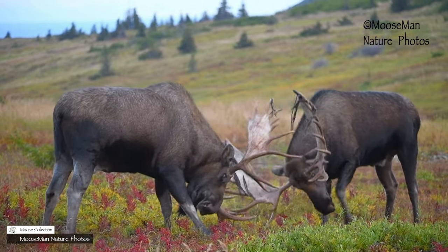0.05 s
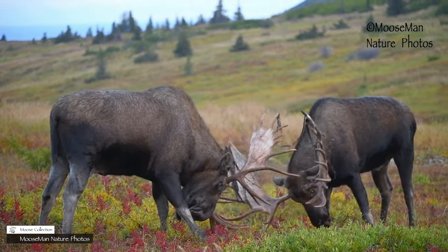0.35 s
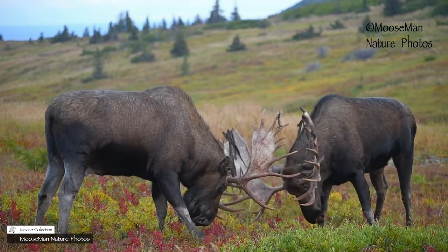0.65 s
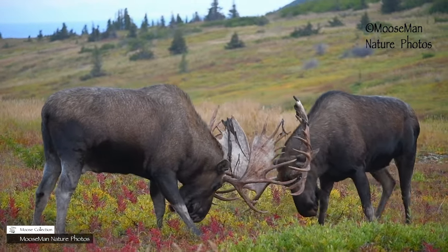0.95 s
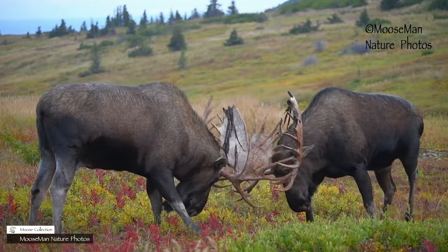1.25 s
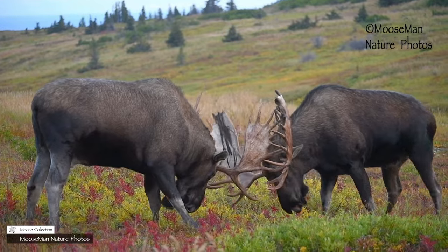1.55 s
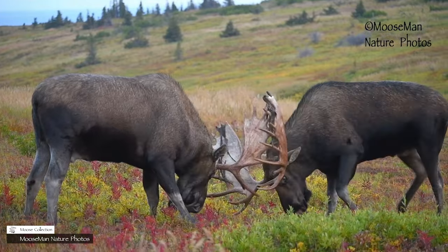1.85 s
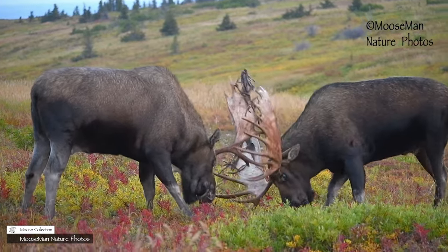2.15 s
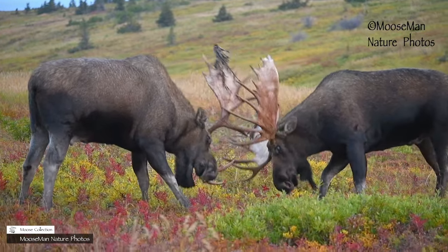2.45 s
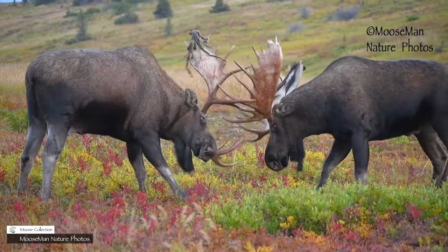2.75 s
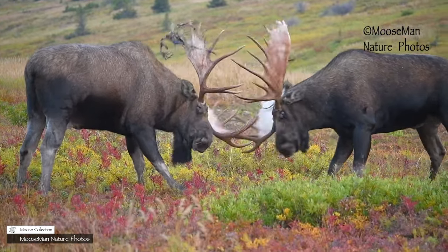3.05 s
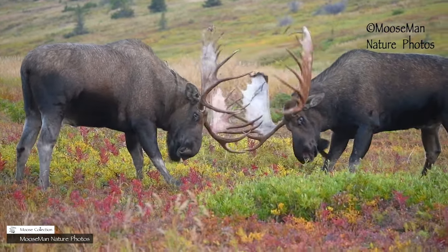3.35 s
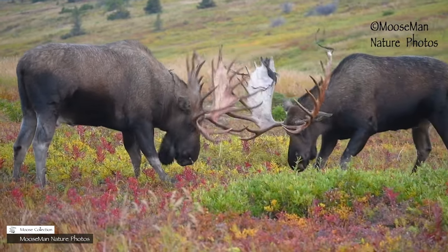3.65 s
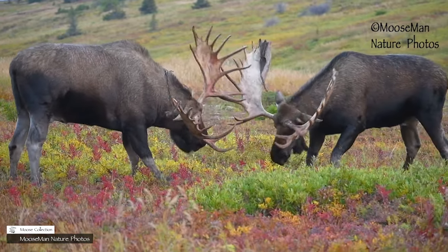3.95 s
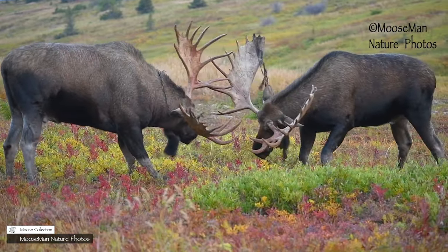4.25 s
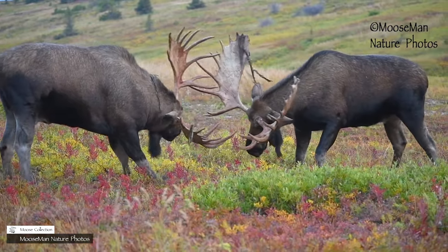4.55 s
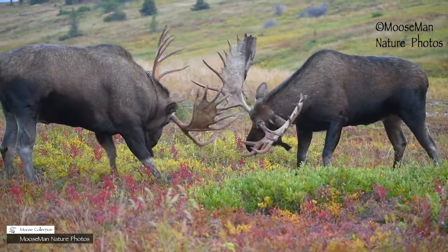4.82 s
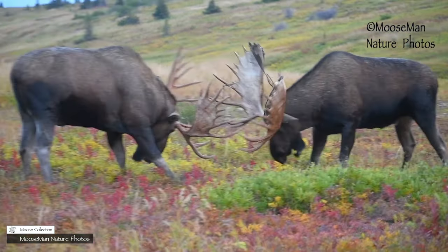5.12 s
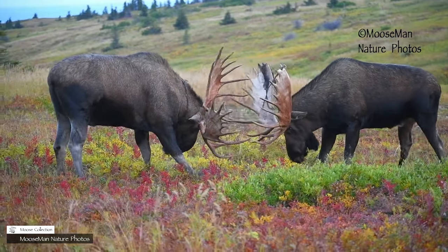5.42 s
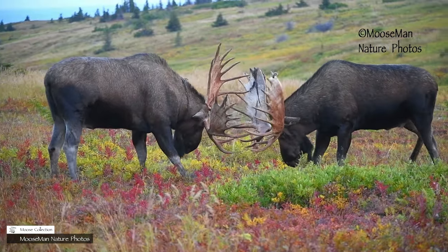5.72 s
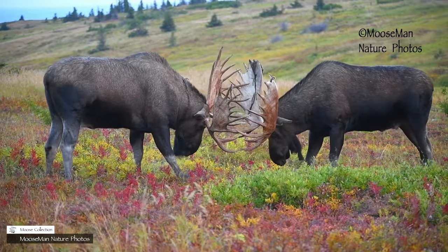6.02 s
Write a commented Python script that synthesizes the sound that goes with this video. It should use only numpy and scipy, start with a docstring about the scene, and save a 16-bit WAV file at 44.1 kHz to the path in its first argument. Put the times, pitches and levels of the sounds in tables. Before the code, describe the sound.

Two bull moose spar on open tundra, their antlers straight ahead of the microphone. Light bony clacks and dull knocks come in irregular clusters, with short scraping rattles and a few bright snaps. The hardest blows land around the middle, followed by a quick clattering flurry and some lighter taps. Distant air hisses steadily, a breeze rumbles softly on the microphone, and shrubs rustle faintly nearby.

```python
"""Open tundra: two bull moose spar, their antlers clacking, skidding and rattling in irregular bouts.
Each contact sends bending waves through tines and palms, treble first, the hollow ring after it.
Rough bone sticks and slips, hard tips snap together, and the hillside answers faintly. Distant air
hisses, a breeze bumps the microphone's ports, shrubs stir and something brushes lightly close by."""
import sys
import numpy as np
from scipy import signal
from scipy.fft import rfft, irfft, next_fast_len
from scipy.io import wavfile
from scipy.ndimage import map_coordinates

SR = 44100
rng = np.random.default_rng(int(sys.argv[2]) if len(sys.argv) > 2 else 0)


def to_wav(s):
    """Save 16-bit WAV."""
    ch = np.atleast_2d(s).T  # columns
    pcm = np.round(np.clip(ch, -1, 1) * 32767)  # PCM
    wavfile.write(sys.argv[1], SR, pcm.astype(np.int16))


N = 268260
RING_SIZE = 8192  # samples of room for a short sound to ring out

# The lasting modes of the antlers. Each row: pitch in Hz, level in dB, t60 in seconds.
ANTLER_MODES = [(137.3, -22.5, 0.31), (197.9, -7, 0.11), (331.3, -16, 0.089), (436, -2.5, 0.094),
                (505.7, -6.5, 0.13), (573.5, -2.5, 0.081), (669, 2, 0.049), (750.6, -10.5, 0.13),
                (903, -11, 0.086), (982, -7.5, 0.071), (1110, 2.5, 0.056), (1233, 5, 0.025),
                (1545, 6, 0.022), (1666, -5.5, 0.05), (1963, 3, 0.029), (2295, -6.5, 0.043),
                (2793, -2.5, 0.027), (3267, -4.5, 0.024), (3930, -12.5, 0.034), (4640, -8, 0.0078),
                (5130, -25, 0.055)]


def amp(db):
    """Decibels to gain."""
    return 10 ** (np.asarray(db) / 20)


def unit(x):
    """x at rms 1."""
    return x / np.sqrt(np.mean(x ** 2) + 1e-20)


def along(points, hz):
    """(Hz, value) points read on a log axis."""
    f, v = np.transpose(points)
    return np.interp(np.log(hz + 1), np.log(f + 1), v)


def wobble(rate):
    """A smooth random curve, rate knots a second."""
    knots = rng.standard_normal(int(N * rate / SR) + 4)
    return map_coordinates(knots, [np.arange(N) * rate / SR])


def filtered(x, response):
    """x through a filter whose gain is a function of frequency."""
    n = x.shape[-1]
    m = next_fast_len(n + RING_SIZE)
    return irfft(rfft(x, m) * response(np.fft.rfftfreq(m, 1 / SR)), m)[..., :n]


def equalised(x, eq):
    """x through an EQ curve of (Hz, dB) points."""
    return filtered(x, lambda hz: amp(along(eq, hz)))


def add(track, s, sound):
    """Mix a sound into a track at s seconds."""
    part = track[..., round(s * SR):][..., :sound.shape[-1]]
    part += sound[..., :part.shape[-1]]


def panned(x, pan_db):
    """x placed in stereo, the left pan_db above the right."""
    return x * amp([[pan_db / 2], [-pan_db / 2]])


def stroke(t, length, rise, fall):
    """An envelope that rises, holds until length and dies away."""
    return (1 - np.exp(-t / rise)) * np.exp(-np.maximum(t - length, 0) / fall)


def stereo_noise(eq, likeness):
    """Coloured noise of rms 1; likeness holds (Hz, left-right correlation) points."""
    def mid_side_gains(hz):
        angle = np.arccos(np.clip(along(likeness, hz), -1, 1)) / 2
        return amp(along(eq, hz)) * [np.cos(angle), np.sin(angle)]
    mid, side = filtered(rng.standard_normal((2, N)), mid_side_gains)
    return unit(np.array([mid + side, mid - side]))


def dying_noise(t60s, size):
    """Noise in which every frequency dies at its own speed."""
    hz, t, spectra = signal.stft(rng.standard_normal(size), SR, nperseg=128)
    decay = amp(-60 * t / along(t60s, hz)[:, None])
    return signal.istft(spectra * decay, SR, nperseg=128)[1][:size]


def air(start_db=-37.5, fall_db_per_s=0.23):
    """Distant air: an even bed of hiss that slowly eases."""
    # The colour of the hiss. Each row: frequency in Hz, gain in dB.
    hiss_eq = [(88, -51), (150, -26), (193, -13), (291, -6.5), (383, -5.5), (439, -5), (555, -1.5),
               (662, -2), (941, -1.5), (1760, -3), (1980, -4.5), (2220, -6.5), (4410, -18.5), (16000, -32)]
    # Its stereo image. Each row: frequency in Hz, left-right correlation.
    likeness = [(60, 0.16), (150, 0.82), (380, 0.97), (950, 0.82), (2380, 0.21), (5980, -0.48),
                (15000, 0.26)]
    level_db = start_db - fall_db_per_s * np.arange(N) / SR + 0.2 * wobble(4.87)
    return amp(level_db) * stereo_noise(hiss_eq, likeness)


def breeze(gust_db=4.5, lift_db=7.0):
    """Wind bumps the microphone: lumpy rumble and a few stronger puffs, different at each port."""
    # The rumble's rise and fall. Each row: time in seconds, level in dB before the lift.
    swells = [(0.0, -48.5), (0.44, -58.5), (0.71, -48), (2.37, -46.5), (2.79, -55), (3.15, -43.5),
              (3.33, -53), (3.52, -65), (4.27, -59), (5.21, -63), (5.84, -59), (6.08, -47)]
    # Its colour. Each row: frequency in Hz, gain in dB.
    rumble_eq = [(12, -36), (20, -5.5), (70, 1.5), (151, -10.5), (179, -8), (199, -26), (350, -22),
                 (460, -47), (770, -120)]
    # Puffs on the ports. Each row: start and length in seconds, level in dB, pitch in Hz, pan in dB.
    puffs = [(0.534, 0.027, -28.5, 111, -4), (0.587, 0.035, -32.5, 55, -14), (1.43, 0.014, -20.5, 104, -8),
             (5.863, 0.056, -37.5, 67.4, -26.5)]
    level_db = np.interp(np.arange(N) / SR, *np.transpose(swells)) + lift_db
    lumps = amp(gust_db * np.array([wobble(16) for _ in range(2)]))
    out = amp(level_db) * unit(lumps * stereo_noise(rumble_eq, likeness=[(40, 0.51), (150, 0.93)]))
    t = np.arange(RING_SIZE) / SR
    for s, length, db, pitch_hz, pan_db in puffs:
        noise = rng.standard_normal((2, len(t)))
        eddy = unit(filtered(noise, lambda hz: hz / (pitch_hz * (1 + (hz / pitch_hz) ** 3.5))))
        add(out, s, panned(amp(db) * eddy * stroke(t, length, rise=0.0072, fall=0.0074), pan_db))
    return out


def knock(levels_db, struck, corner_hz, first_db, attack_s, build_cycles, crowd_db=-7.0, spread_db=5.0):
    """One antler contact: a sharp first wave, then ringing modes led by the struck palm and tine."""
    # The three crossovers between thud, ring, clack and crack, in Hz.
    crossovers = [400, 900, 2200]
    # The crowd of short-lived modes between the lasting ones. Each row: frequency in Hz, gain in dB.
    crowd_eq = [(40, -18), (120, 4.5), (400, -0.5), (700, 12.5), (2000, 4.5), (3200, -4), (5000, -12.5),
                (8000, -19), (16000, -24)]
    # How that crowd dies away. Each row: frequency in Hz, t60 in seconds.
    crowd_decay = [(150, 0.22), (600, 0.017), (1500, 0.049), (3500, 0.029), (12000, 0.067)]
    t, f = np.arange(RING_SIZE) / SR, np.fft.rfftfreq(RING_SIZE, 1 / SR)
    hz, db, t60 = np.transpose(ANTLER_MODES + struck)[:, :, None]
    strength, detune, phase = rng.standard_normal((3, len(hz), 1))
    strength[len(ANTLER_MODES):] = detune[len(ANTLER_MODES):] = 0  # struck parts keep level and pitch
    tones = np.sin(2 * np.pi * (hz * (1 + 0.016 * detune) * t + phase))
    modes = amp(db + spread_db * strength - 60 * t / t60) * tones
    ring = unit((modes * (1 - np.exp(-t * hz / build_cycles))).sum(0))
    crowd = dying_noise(crowd_decay, size=RING_SIZE) * (1 - np.exp(-t / attack_s))
    crowd = unit(equalised(crowd, crowd_eq))
    rebound_s = rng.uniform(0.001462, .0045)  # the tines touch again
    rebound = 1 + 0.57 * np.exp(-2j * np.pi * f * rebound_s)
    first_wave = unit(irfft(amp(along(crowd_eq, f)) * rebound * f / (f + crossovers[1])))
    spectrum = rfft(ring + amp(crowd_db) * crowd + amp(first_db) * first_wave)
    spectrum *= (1 + (f / corner_hz) ** 8) ** -.15  # a blunt contact leaves out the top
    lowpasses = [0 * f] + [1 / (1 + (f / edge) ** 10) for edge in crossovers] + [0 * f + 1]
    bands = np.diff(lowpasses, axis=0) * spectrum
    # bending waves travel at a speed that grows with the root of frequency, so the lows arrive late
    travel_s = 0.001579  # delay at the middle crossover
    dispersion = np.exp(-4j * np.pi * travel_s * np.sqrt(f * crossovers[1]))
    blow = sum(amp(level) * unit(irfft(band * dispersion)) for level, band in zip(levels_db, bands))
    return blow[:RING_SIZE * 3 // 4]


def clashes():
    """Antlers collide: glancing blows thud and ring dully, square ones clack and crack brightly."""
    # The blows. Each row: time in seconds, strength in dB, hardness in dB (glancing below 0,
    # square above), palm pitch in Hz, tine pitch in Hz.
    contacts = [(.513, -26, 12, 534, 2150), (0.53, -20, 9.5, 867, 1270), (.572, -35, 10.5, 513, 1141),
                (.615, -33, -2, 530, 1530), (.672, -30.5, -2.5, 497, 1120), (.697, -34, 8, 553, 1140),
                (.763, -24.5, -2, 866, 960), (.807, -33.5, 3, 536, 1010), (.83, -29, -1, 673, 950),
                (1.193, -34.5, 2, 580, 1020), (1.382, -30, -8, 458, 980), (1.442, -29.5, -21, 543, 1010),
                (1.522, -25.5, 5.5, 695, 1267), (1.682, -21, 6, 665, 1660), (1.958, -23, 1, 546, 960),
                (1.985, -20.5, 16, 465, 950), (2.006, -27.5, 8, 570, 980), (2.058, -25.5, 4.5, 535, 990),
                (2.108, -27, -6, 613, 1380), (2.242, -30.5, -8, 582, 1020), (2.264, -37.5, -8.5, 630, 1080),
                (2.362, -31.5, 4, 616, 1075), (2.4785, -21.5, 22, 583, 1835), (2.4835, -16, -15, 576, 1020),
                (2.723, -37.5, 4, 550, 990), (2.868, -34, -21, 714, 1157), (2.9454, -11, 3, 677, 1068),
                (3.009, -15.5, 9.5, 489, 1040), (3.02, -24.5, -18, 443, 1090),
                (3.128, -17.5, -1, 661, 1520), (3.4205, -10, 2, 696, 1078), (3.5445, -17, -3.5, 581, 927),
                (3.58, -31, -3, 494, 969), (3.663, -29, -15, 645, 1080), (3.759, -25.5, -10, 656, 960),
                (3.809, -16, -10, 685.5, 1184), (3.831, -16.5, -0.5, 681, 1274),
                (3.868, -21, -9, 665, 1200), (4.128, -25, -4.5, 669, 970), (4.411, -29, -11, 616, 1170),
                (4.445, -32, -1, 714, 1220), (4.55, -38.5, -12, 588, 1060), (4.648, -16, -1, 645, 1320),
                (4.659, -25, 1, 770, 1250), (4.6665, -24, 5, 708, 1227), (4.688, -19, -3, 597, 1560),
                (4.698, -14, 1.5, 653, 1200), (4.7109, -15, 8, 636, 1280), (4.8123, -20, 14, 870, 1665),
                (4.817, -22, 13, 860, 1280), (4.827, -17.5, 2.5, 446, 1280), (5.456, -24.5, 7, 840, 1086),
                (5.488, -32.5, 0, 870, 1120), (5.511, -26.5, 0, 574, 1165), (5.997, -29, 8, 674, 1105)]
    # Thud, ring, clack and crack. Each row: dB relative to strength, dB gained per dB of hardness.
    band_balance = [(-24, 0.02), (-10.5, -0.2841), (-13, 0.37), (-25, 0.8936)]
    balance_db, growth = np.transpose(band_balance)
    out = np.zeros(N)
    for s, db, hard_db, palm_hz, tine_hz in contacts:
        levels_db = db + balance_db + growth * hard_db
        struck = [(palm_hz, 6, .075), (tine_hz, 8.5, .034)]  # two more rows of antler modes
        sharp_db = levels_db[-1] + 29.5  # a strong crack starts fast and bright, a weak one swells
        blow = knock(levels_db, struck,
                     corner_hz=4400 * amp(0.39 * sharp_db), first_db=-6 + 0.066 * sharp_db,
                     attack_s=0.0017 * amp(-.3 * sharp_db), build_cycles=1.47 * amp(-.2 * sharp_db))
        add(out, s, blow)
    return out


def skids(slips_per_s=700, t60_scale=0.73):
    """Rough bone sticks and slips, driving a quick irregular rattle into the antlers' modes."""
    # Tines sliding over each other. Each row: start and length in seconds, level in dB.
    slides = [(0.514, 0.028, -25.5), (1.989, 0.12, -26.5), (2.646, 0.12, -36.5), (2.919, 0.022, -31.5),
              (2.975, 0.1, -34), (3.727, 0.054, -28.5), (3.772, 0.089, -26), (3.894, 0.026, -32),
              (4.141, 0.035, -31),  (5.462, 0.024, -24)]
    rattle_eq = [(150, -13), (600, -0.5), (1500, -8.0), (3000, -15.5), (5000, -13)]
    t = np.arange(2 * RING_SIZE) / SR
    out = np.zeros(N)
    for s, length, db in slides:
        slips = (rng.random(len(t)) < slips_per_s / SR) * rng.standard_normal(len(t))
        body = sum(amp(level - 60 * t / (t60 * t60_scale)) * np.sin(2 * np.pi * (hz * t + rng.random()))
                   for hz, level, t60 in ANTLER_MODES)
        rattle = equalised(signal.fftconvolve(slips, body)[:len(t)], rattle_eq)
        add(out, s, amp(db) * unit(rattle) * stroke(t, length, rise=0.005, fall=0.021))
    return out


def snaps(trim_db=-26.5, click_s=0.0005, splinter_db=-21, splinter_s=0.011):
    """Hard tine tips meet with a very short bright click and a brief splintery tail."""
    # The tip strikes. Each row: time in seconds, level in dB before the trim.
    strikes = [(.7623, -6.5), (2.4787, -13), (2.9462, -19), (3.0102, -19.5), (3.4235, -23)]
    # The colour of the click. Each row: frequency in Hz, gain in dB.
    click_eq = [(500, -1), (3000, -3.5), (8000, -8), (13000, -10), (15500, -3), (17500, -15)]
    t = np.arange(RING_SIZE) / SR
    fade = np.exp(-t / click_s) + amp(splinter_db) * np.exp(-t / splinter_s)
    out = np.zeros(N)
    for s, db in strikes:
        click = equalised(rng.standard_normal(len(t)) * fade, click_eq)
        add(out, s, amp(db + trim_db) * unit(click))
    return out


def brushing(grain_db=3, crackles_per_s=650, crackle_db=-2):
    """Shrubs stir softly, and short crackly swishes pass close by, each fading and flicking once."""
    # Swells in the low shrubs. Each row: time of the peak in seconds, level in dB.
    stirs = [(1.4, -47), (1.98, -49.5), (3.13, -50), (4.92, -49)]
    # Swishes beside the microphone. Each row: start and length in seconds, base level in dB, pan in dB.
    swishes = [(1.96, 0.18, -39.5, 2), (2.141, 0.005, -44, -3), (2.184, 0.018, -43, -1),
               (2.444, 0.11, -43, 13), (3.958, .11, -42, 10.5), (4.106, .11, -41.5, 10),
               (5.946, .11, -42.5, 11.5)]
    # The colour of both. Each row: frequency in Hz, gain in dB.
    rustle_eq = [(300, -36), (1500, 5), (3000, 4), (6000, -1.5), (11000, 0), (15000, 4)]
    rest_db, stir_width_s, sag_db_per_s = -59, 0.091, 33
    flick_share, flick_s, flick_db = 0.38, 0.013, 3
    t, now = np.arange(2 * RING_SIZE) / SR, np.arange(N) / SR
    stirring = sum(amp(db) * np.exp(-((now - s) / stir_width_s) ** 2) for s, db in stirs)
    level = panned(amp(rest_db) + stirring, 0)
    for s, length, db, pan_db in swishes:
        swish = amp(db + 1 - sag_db_per_s * t) * stroke(t, length, rise=0.0015, fall=0.0097)
        flick = amp(db + flick_db) * stroke(t, flick_s, rise=0.0046, fall=0.0027)
        add(level, s, panned(swish, pan_db))
        add(level, s + flick_share * length, panned(flick, pan_db))
    noise = stereo_noise(rustle_eq, likeness=[(2000, 0.41), (5000, 0.24), (9000, 1.0)])
    rustle = unit(noise * amp(grain_db * wobble(300)))
    ticks = (rng.random(N) < crackles_per_s / SR) * rng.standard_normal(N)
    crackle = unit(equalised(ticks, rustle_eq))
    return level * unit(rustle + amp(crackle_db) * crackle)


def hillside(x, build_s=0.017):
    """Shrubs and slope scatter the sound back as a diffuse tail."""
    # How the tail dies away. Each row: frequency in Hz, t60 in seconds.
    tail_decay = [(150, 0.66), (800, 0.093), (3000, 0.13), (10000, 0.45)]
    tail = dying_noise(tail_decay, size=2 * RING_SIZE)
    tail *= 1 - np.exp(-np.arange(len(tail)) / SR / build_s)
    return signal.fftconvolve(x, tail / np.linalg.norm(tail))[:N]


def width(x, corner_hz=4500, scatter_s=0.00044):
    """A side signal: the short waves of the treble reach the two ports differently."""
    t = np.arange(RING_SIZE) / SR
    scatter = rng.standard_normal(len(t)) * np.exp(-t / scatter_s)
    side = signal.fftconvolve(x, scatter / np.linalg.norm(scatter))[:N]
    return np.outer([1, -1], filtered(side, lambda hz: hz ** 2 / (hz ** 2 + corner_hz ** 2)))


def scene():
    """Antlers straight ahead, with the open air around them."""
    bone = clashes() + skids()
    antlers = bone + snaps()
    space = amp(-8.5) * width(antlers) + amp(-15.5) * hillside(bone)
    return antlers + space + brushing() + breeze() + air()


def record(dry):
    """A soft clip rounds off the loudest peaks, then a steep low-pass cuts the very top."""
    ceiling, top_hz = 1.05, 16200
    rounded = dry / (1 + np.abs(dry / ceiling) ** 5) ** (1 / 5)
    return filtered(rounded, lambda hz: 1 / (1 + (hz / top_hz) ** 90))


dry = scene()
out = record(dry)
to_wav(out)
```